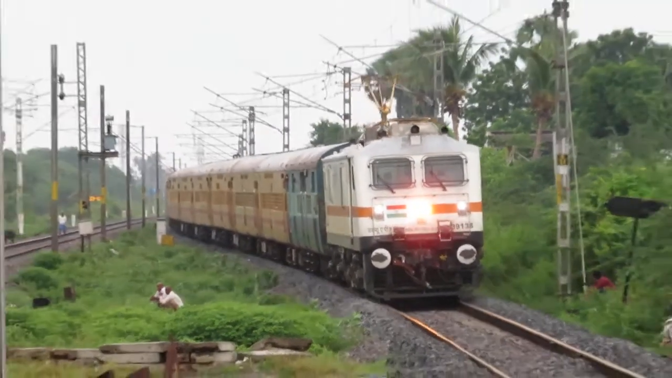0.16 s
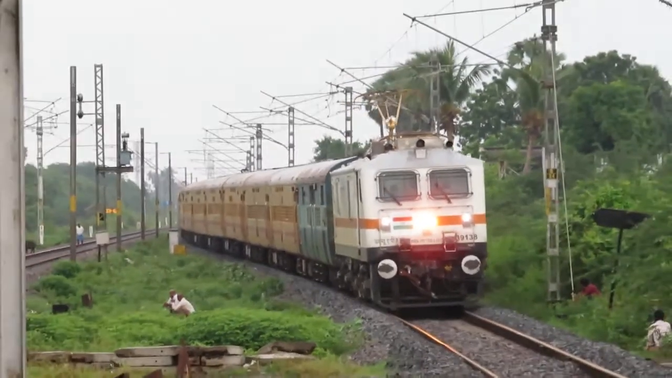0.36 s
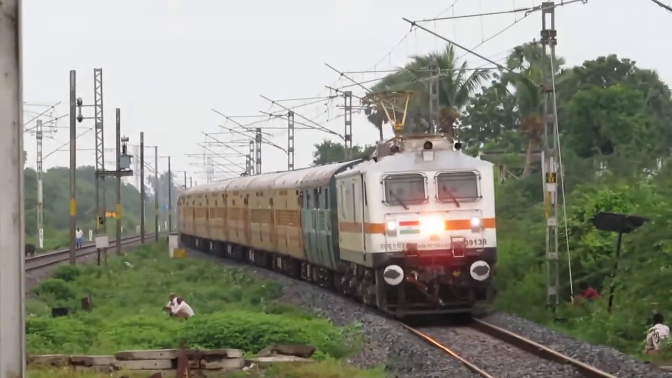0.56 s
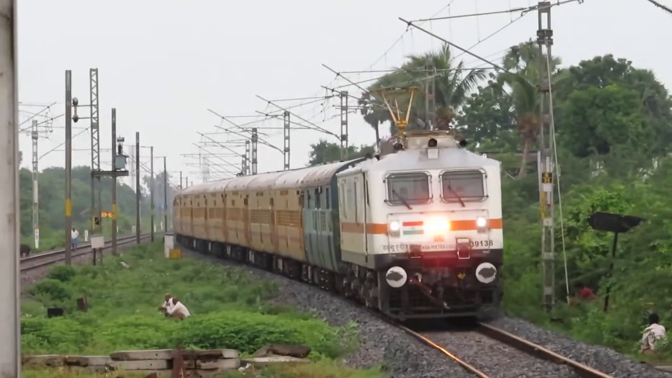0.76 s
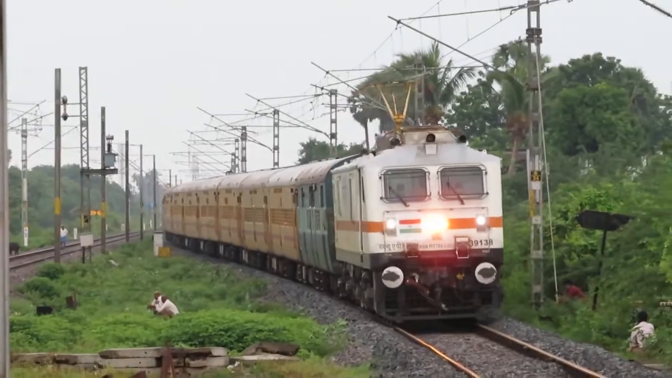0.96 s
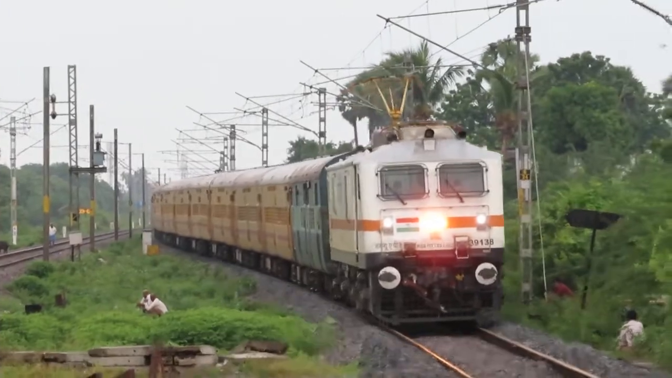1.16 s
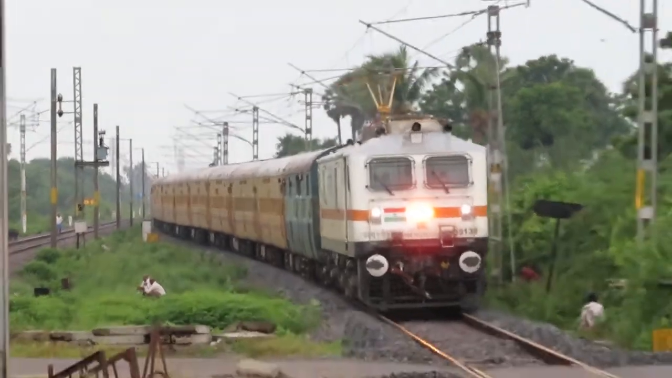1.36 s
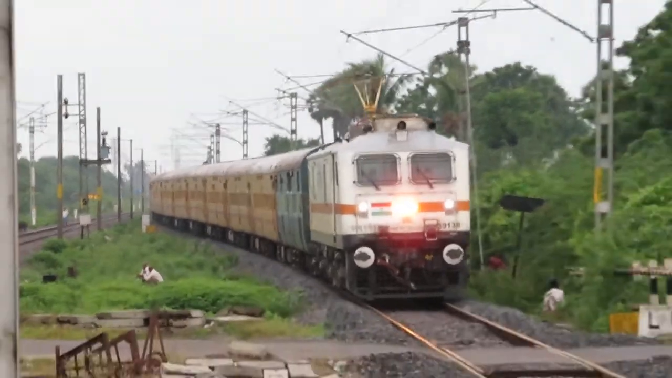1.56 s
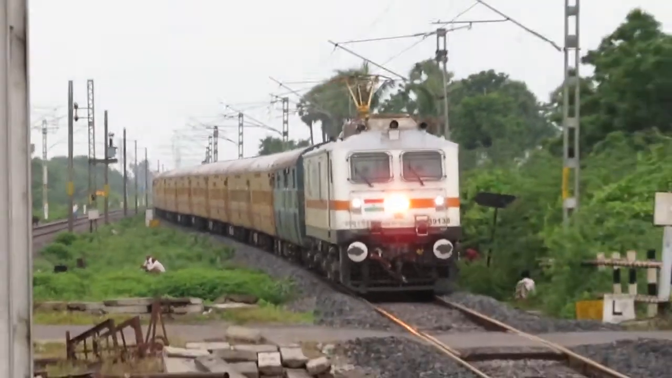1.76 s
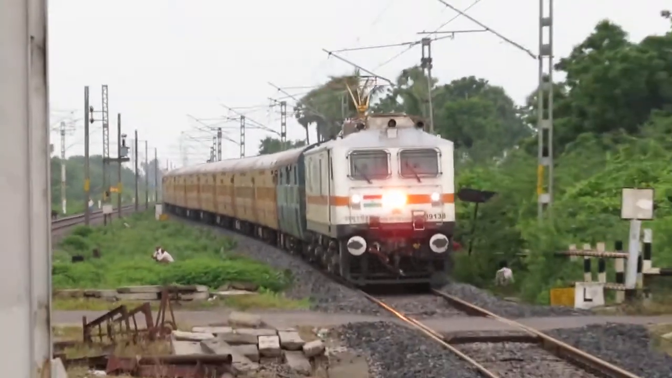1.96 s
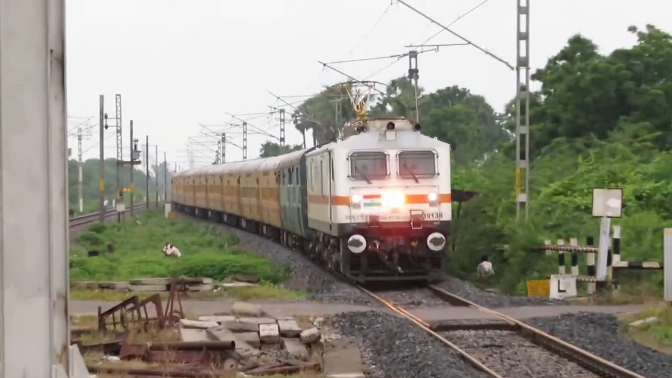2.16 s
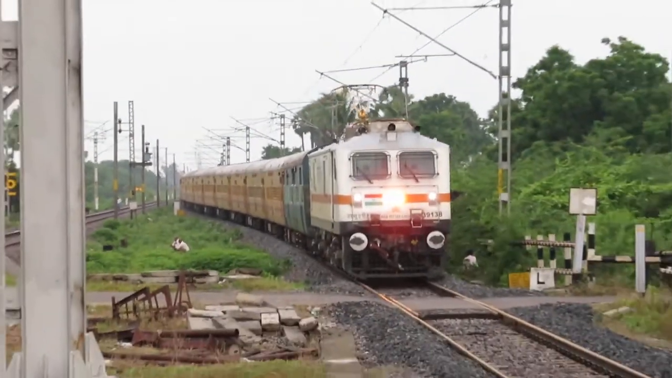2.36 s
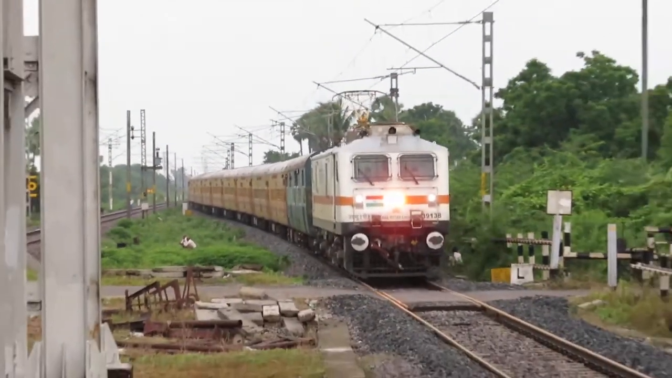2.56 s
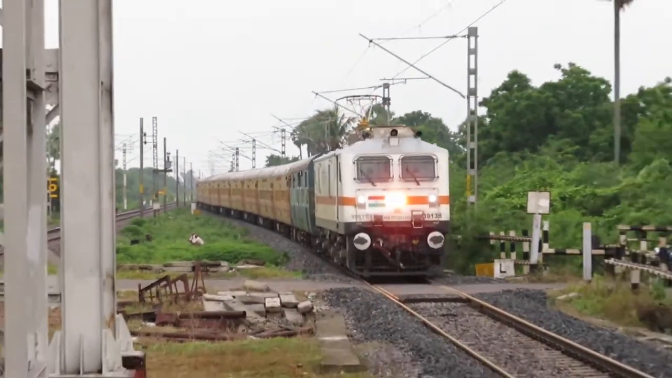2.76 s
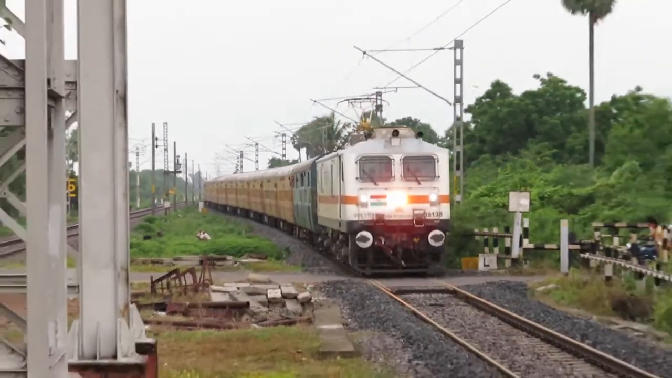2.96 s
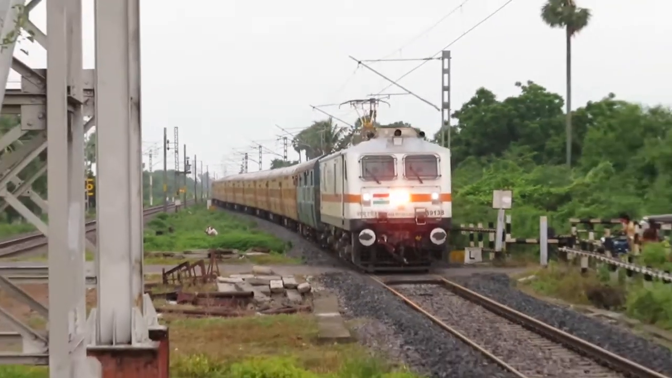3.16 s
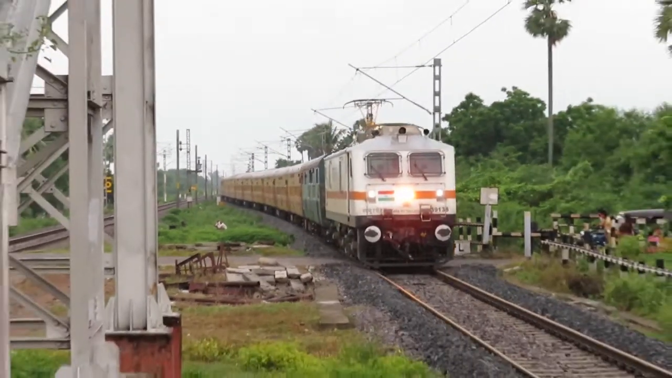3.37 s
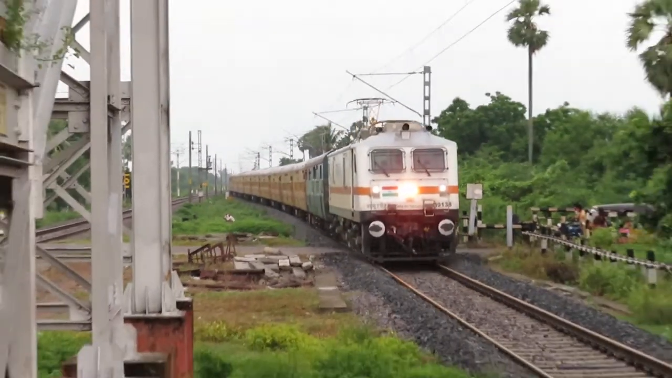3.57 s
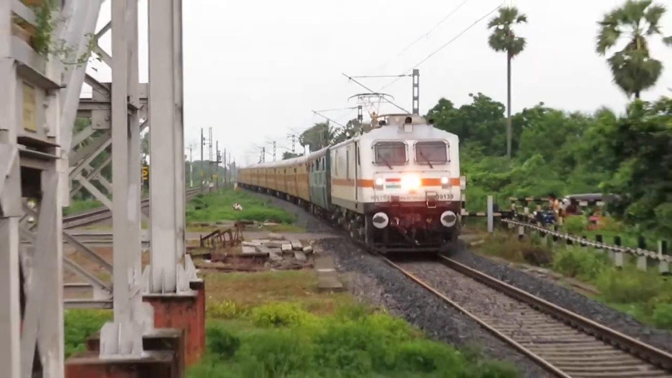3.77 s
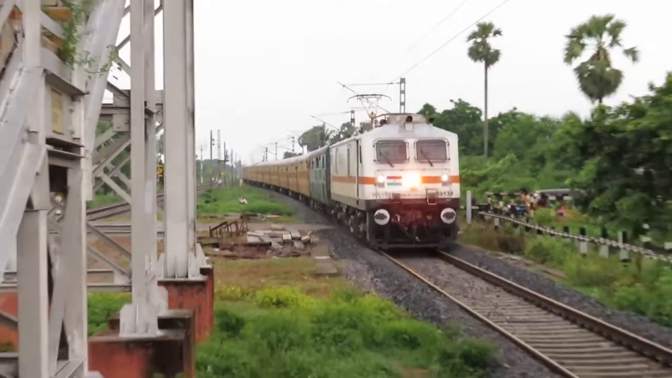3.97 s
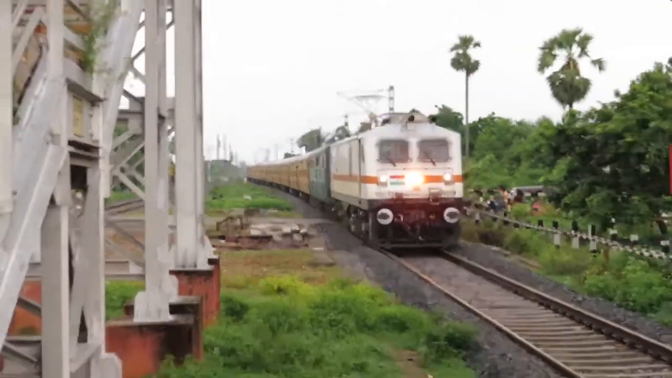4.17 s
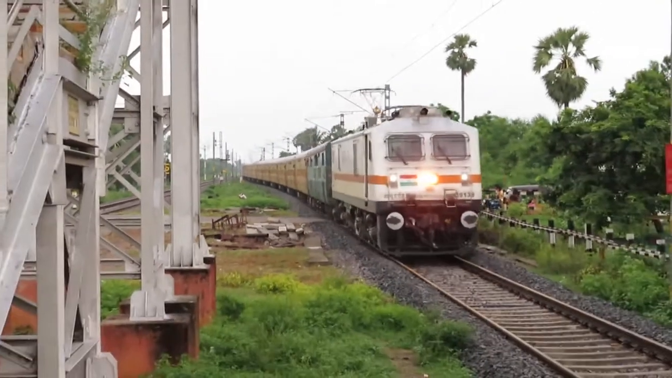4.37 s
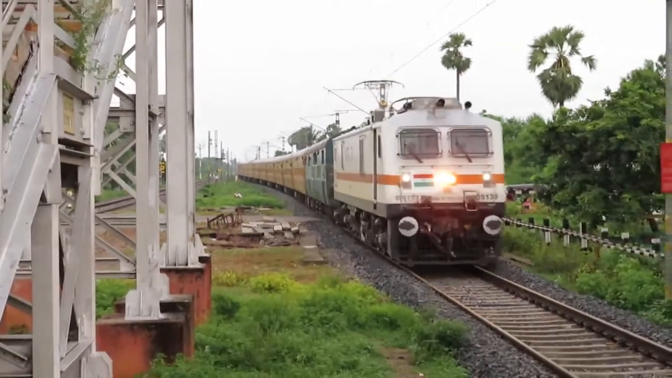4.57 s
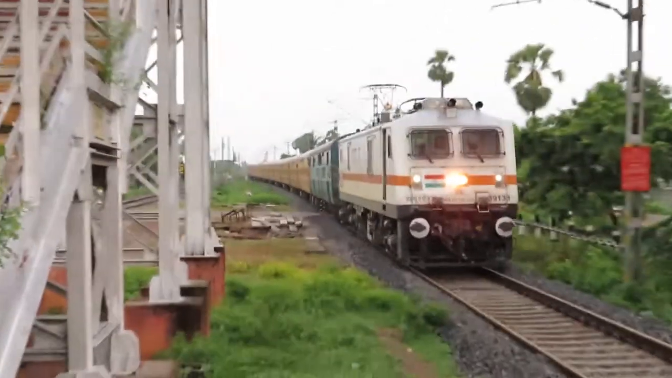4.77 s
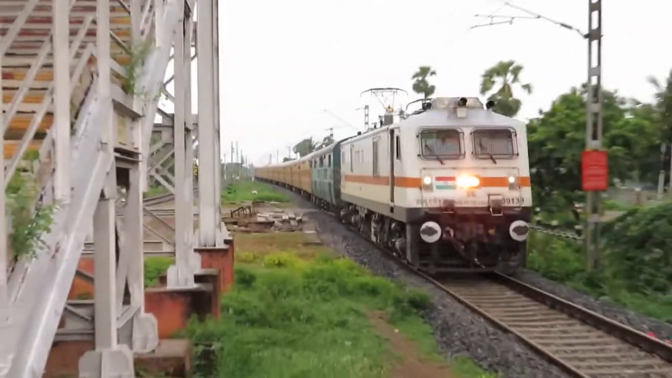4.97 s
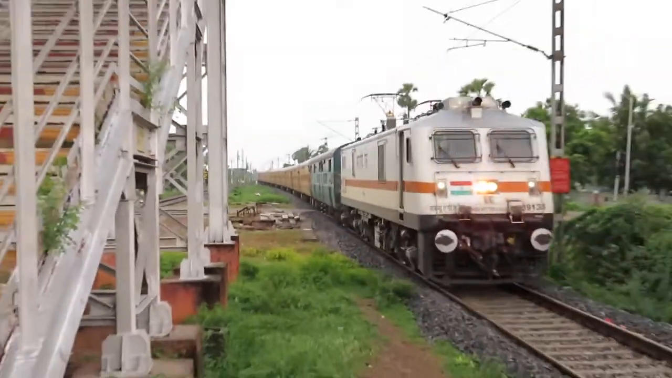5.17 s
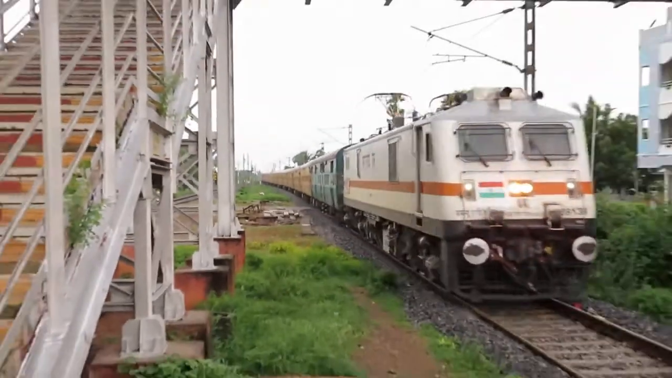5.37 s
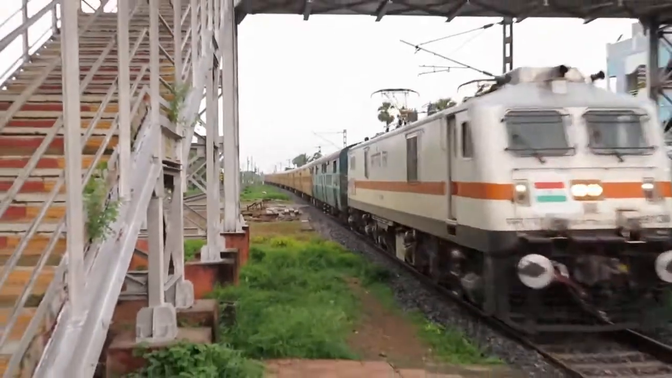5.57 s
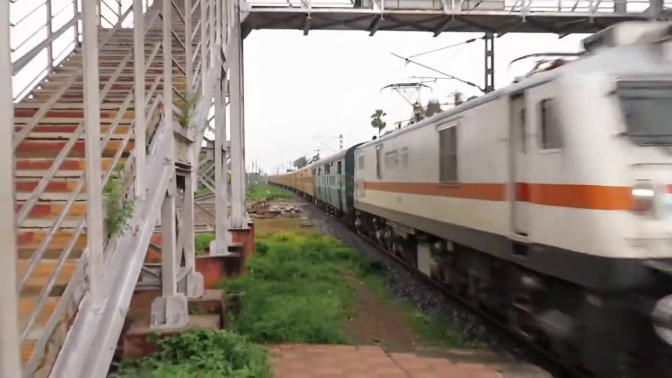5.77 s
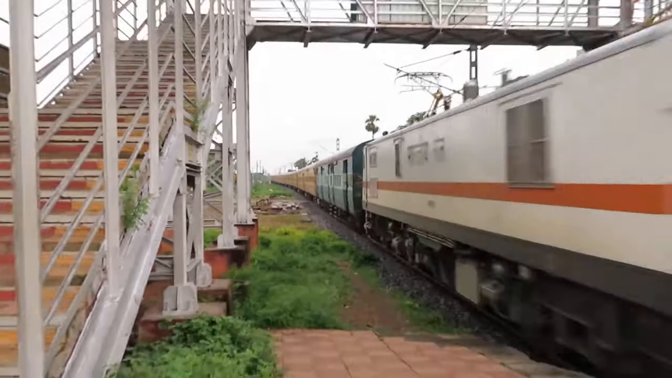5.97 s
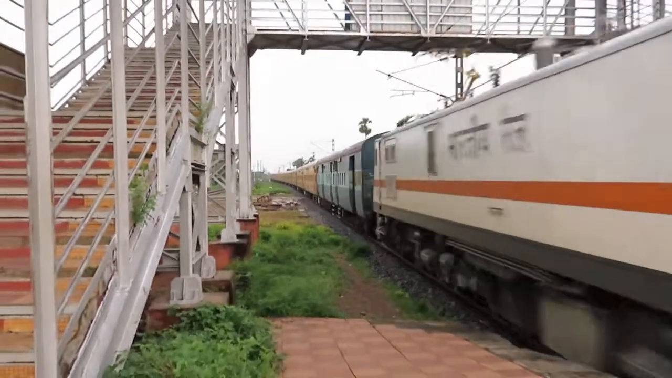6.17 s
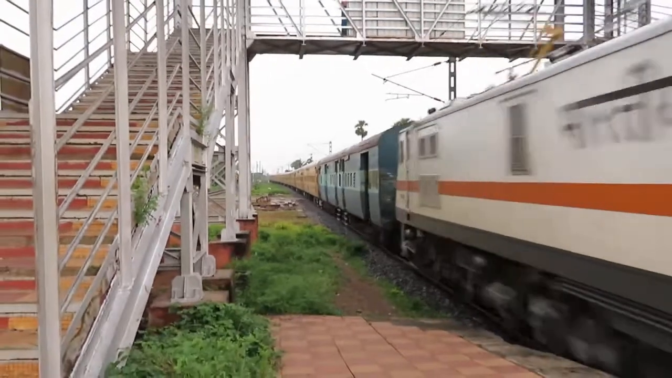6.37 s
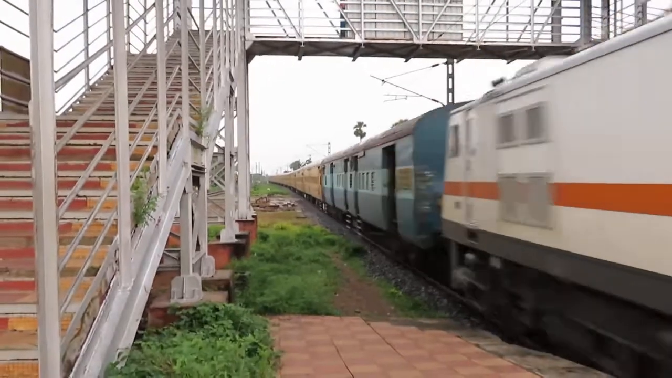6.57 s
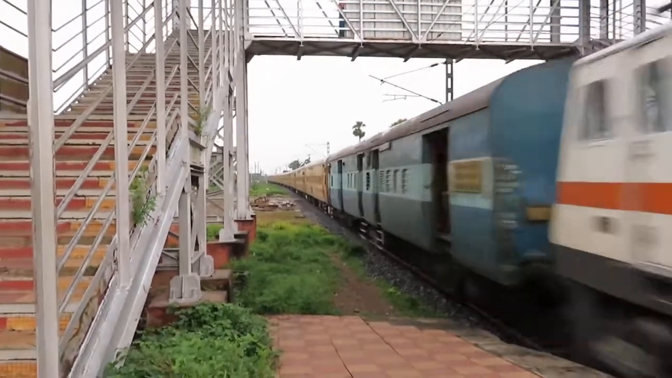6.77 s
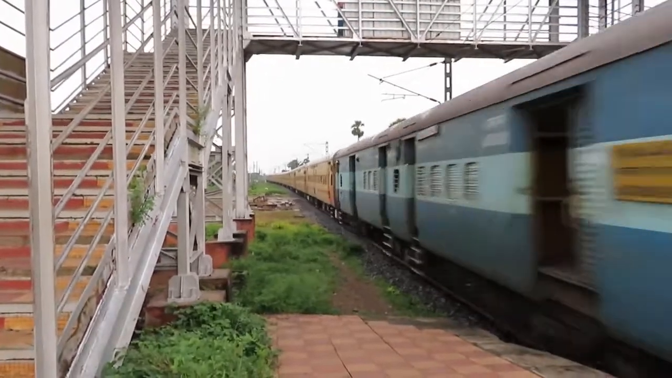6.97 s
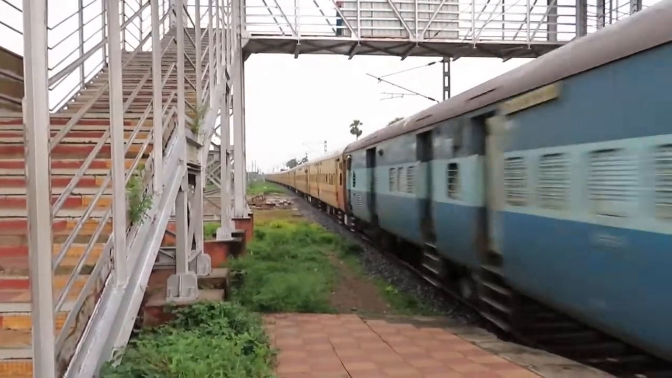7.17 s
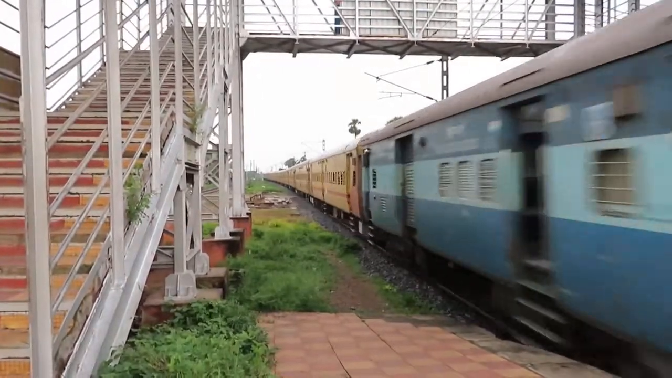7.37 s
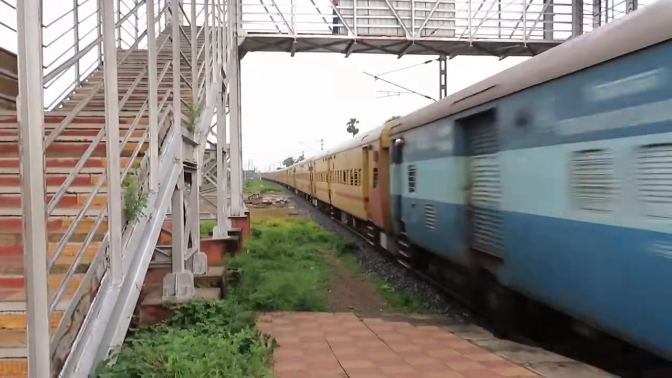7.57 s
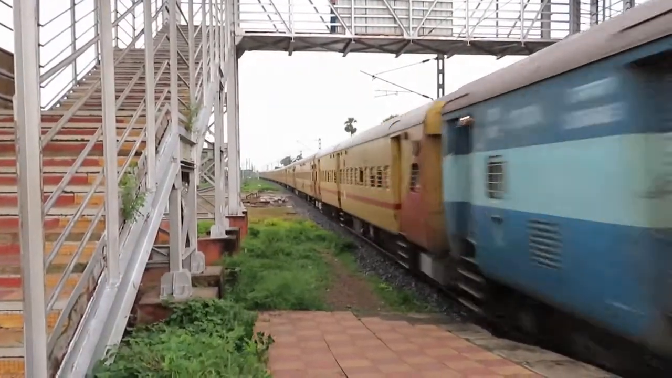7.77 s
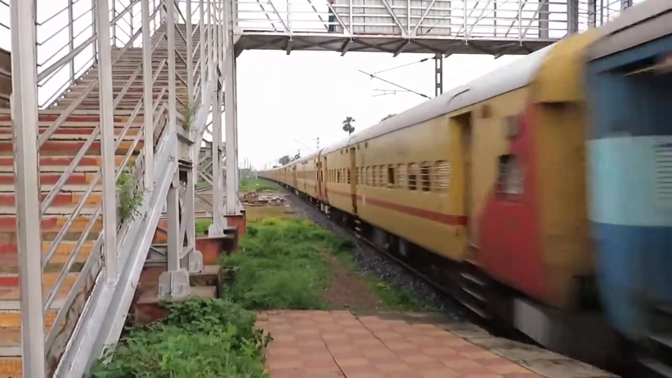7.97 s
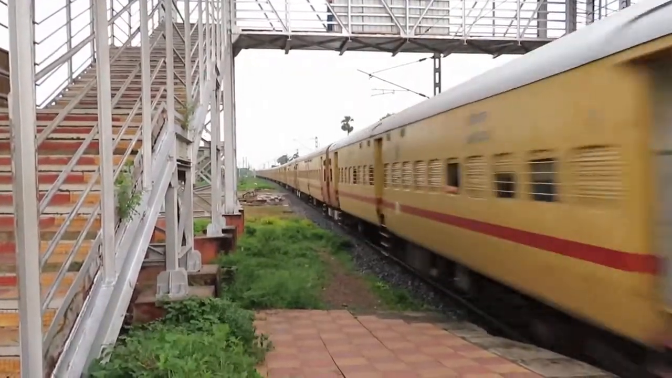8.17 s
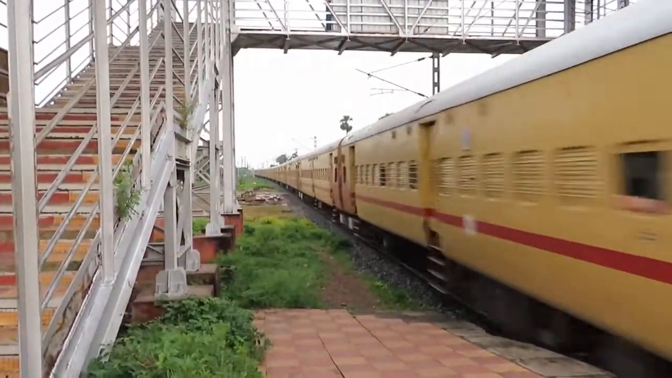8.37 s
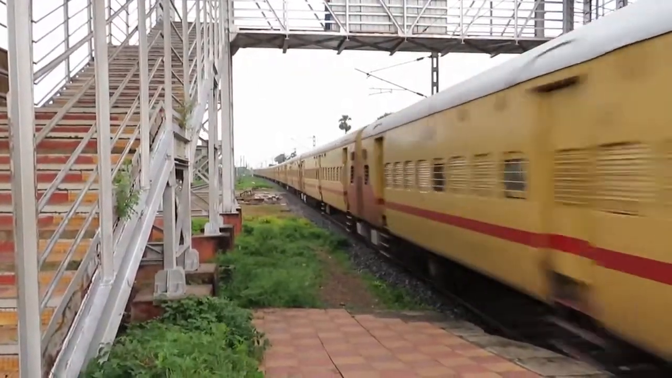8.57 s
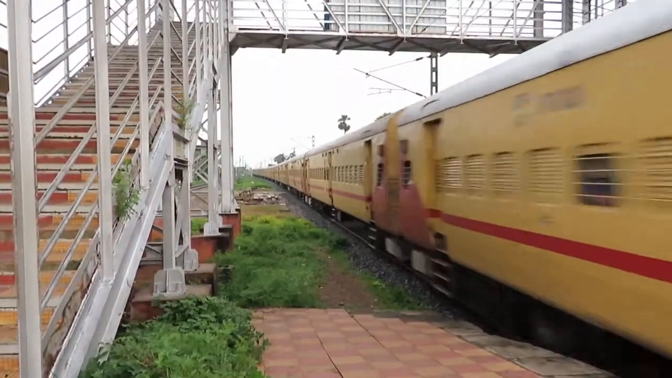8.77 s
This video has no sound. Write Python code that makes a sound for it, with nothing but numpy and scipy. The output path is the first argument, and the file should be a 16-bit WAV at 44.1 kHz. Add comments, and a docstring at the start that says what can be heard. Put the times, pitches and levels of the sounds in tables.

```python
"""A station platform: an electric express nears, its air horn already sounding, blows again and runs past.
The horn is a brassy stack of harmonics, echoed by trees and masts as narrow wavering tones.
Rough wheels shake ground, bogies, sleepers and rails: noise in bands that swells with each group of bogies.
Drive and motors whine and drone, blowers roar in resonant bands, and axles knock as short ringing blows.
The microphone also hears distant rolling and hum, ticks and a thin hiss, ground rumble and side scatter."""
import sys
import numpy as np
from scipy import signal
from scipy.fft import rfft, irfft, next_fast_len
from scipy.io import wavfile
from scipy.ndimage import uniform_filter1d, minimum_filter1d, map_coordinates

SR = 44100
rng = np.random.default_rng(int(sys.argv[2]) if len(sys.argv) > 2 else 0)


def dump_mix(stems):
    """Bounce the given channels to the path in sys.argv[1] as a 16-bit WAV at rate SR."""
    frames = np.atleast_2d(stems).T  # one column per channel
    limited = np.clip(frames, -1, 1)  # hard clip at full scale
    pcm = np.round(limited * 32767).astype(np.int16)
    wavfile.write(sys.argv[1], SR, pcm)


N = 388521
T = np.arange(N) / SR
FREQS = np.maximum(np.fft.rfftfreq(N, 1 / SR), 1)
RELEASE_S = 0.1192  # time scale on which a blast's air drains
ECHO_HZ = 319.6  # pitch of the horn's echoes


def undb(db):
    """Decibels to gain."""
    return 10 ** (np.asarray(db) / 20)


def unit(x):
    """Scale to rms 1."""
    return x / np.sqrt(np.mean(x ** 2) + 1e-18)


def since(s):
    """Seconds since a moment, 0 before it."""
    return np.maximum(T - s, 0)


def curves(rows):
    """Each column of a table, joined by straight lines in time."""
    s, *columns = np.transpose(rows)
    return [np.interp(T, s, c) for c in columns]


def during(rows, fade_s=.02):
    """1 within the time span of a table, fading out beyond it."""
    return np.clip(1 + np.minimum(T - rows[0][0], rows[-1][0] - T) / fade_s, 0, 1)


def hump(at_s, width_s):
    """A smooth rise to 1 and fall, as something goes by; at the control rate."""
    return 1 / (1 + ((T[::64] - at_s) / width_s) ** 2)


def sway(rate):
    """Smooth chance with about `rate` turns a second, at the control rate; spread 1."""
    return map_coordinates(rng.standard_normal(2048), [T[::64] * rate], order=3, mode="wrap")


def fine(control):
    """A control brought up to the sample rate."""
    return np.interp(T, T[::64], control)


def walk(rate):
    """Smooth chance at the sample rate."""
    return fine(sway(rate))


def colour(points):
    """Gain at every frequency from (Hz, dB) points."""
    hz, db = np.transpose(points)
    return undb(np.interp(np.log(FREQS), np.log(hz), db))


def resonance(hz, width_hz):
    """Response of one damped mode, 1 at its centre."""
    return 1 / (1 + 1j * (FREQS / hz - hz / FREQS) * hz / width_hz)


def bank(modes):
    """Summed response of (Hz, width Hz, dB) modes, with steep skirts."""
    return sum(undb(db) * np.abs(resonance(hz, width_hz)) ** 2 for hz, width_hz, db in modes)


def ringing(points):
    """A spectrum with the resonances of bogies, track and wheels laid over it."""
    # resonances: pitch_hz, width_hz, boost_db above the spectrum
    rings = [(215, 62, 1.5), (432, 23, 4.5), (838.5, 137.4, 12.5), (1903, 330, 3.5), (2716, 130, 5.5),
             (3570, 290, 3.5)]
    boost_db = sum(db * np.abs(resonance(hz, width_hz)) ** 2 for hz, width_hz, db in rings)
    return colour(points) * undb(boost_db)


def shaped(x, response):
    """Pass a sound through a frequency response; rms 1."""
    size = next_fast_len(N + SR // 10, real=True)
    gain = np.interp(np.fft.rfftfreq(size, 1 / SR), FREQS, response)
    return unit(irfft(rfft(x, size) * gain, size)[:N])


def noise(response):
    """Noise with a given frequency response."""
    return shaped(rng.standard_normal(N), response)


def played(x, speed):
    """Read a sound at a changing speed, so that its resonances glide."""
    return map_coordinates(x, [np.cumsum(speed) - speed[0]], order=1, mode="mirror")


def doppler(passes_s, turn_s, share):
    """Pitch factor of something that goes by: high before, low after."""
    past_s = T - passes_s
    return 1 - share * past_s / np.hypot(past_s, turn_s)


def horn():
    """Two blasts straight down the line, each with its own harmonics and echoes."""
    # blasts: opens_s, closes_s, level_db, bell_level_db, bell_rings_on_s, bell_beat_hz, echo_db, echo_t60_s
    valve_times = [(-.5, 0.443, -12, -16.5, 0.112, 15.4, 2, 2.64),
                   (1.424, 3.226, -14, -15.5, 0.1644, 7.74, 1.5, 1.63)]
    # harmonics of each blast as they arrive: multiple, level_db; the bell supplies multiple 1 itself
    first_timbre = [(1, -4), (2, -28.5), (3, -4), (4, -11), (5, -16), (6, -16), (7, -17.5), (8, -42.5),
                    (9, -22), (10, -23.5), (11, -24.5), (12, -32.5), (13, -28.5), (14, -36.5), (15, -30.5),
                    (16, -41.5), (17, -40), (18, -43), (19, -46.5), (20, -47.5), (21, -39.5), (22, -49.5),
                    (23, -40), (24, -48.5), (25, -48.5), (26, -51.5)]
    second_timbre = [(1, -2), (2, -15), (3, -1), (4, -2), (5, -12), (6, -13), (7, -21), (8, -12),
                     (9, -18.5), (10, -23), (11, -14.5), (12, -29.5), (13, -25.5), (14, -23.5), (15, -28.5),
                     (16, -20), (17, -39.5), (18, -29.5), (19, -36.5), (20, -42.5), (21, -50), (22, -41.5),
                     (23, -39), (24, -47), (25, -47.5), (26, -48.5)]
    blasts = sum(blast(*row, timbre) for row, timbre in zip(valve_times, (first_timbre, second_timbre)))
    return blasts + shifted_echoes(sum(pressure(*row[:3]) for row in valve_times))


def blast(opens_s, closes_s, db, bell_db, rings_s, beat_hz, echo_db, echo_t60_s, timbre,
          rolloff_db=-1.1527, flicker_db=1.0, drift_db=1.61, jitter=0.00051, dip_flutter_db=0.18,
          ripple_db=0.6924):
    """A diaphragm chops the air into a harmonic stack; at low pressure the note is sharp and dull."""
    # pitch of the held note as it arrives: time_s, pitch_hz
    held_pitch = [(0, 320.1), (.42, 319.6), (2.26, 320.2), (2.6, 318.8), (2.9, 318), (3.22, 318.6)]
    # ground reflections cancel harmonics in turn as the train nears: harmonic, time_s, depth_db, half_width_s
    fades = [(5, 0.041, 9, 0.15), (14, 0.35, 3.5, 0.15), (2, 1.95, 11.5, 0.33), (4, 1.53, 5, 0.07),
             (4, 3.225, 22.5, 0.575), (5, 1.786, 33, 0.147), (7, 2.28, 23.5, 0.13), (8, 1.43, 5.5, 0.28),
             (10, 1.63, 8, 0.15), (10, 2.93, 6, 0.25), (11, 2.536, 8, 0.45), (12, 2.38, 11, 0.033),
             (13, 2.48, 19, 0.081), (14, 1.59, 12.5, 0.22), (15, 1.57, 3.5, 0.2), (15, 2.9, 1, 0.33),
             (16, 1.82, 15, 0.46), (16, 2.45, 20.5, 0.3), (17, 2.27, 8.5, 0.03), (18, 2.33, 12.5, 0.22),
             (18, 1.2, 17, 0.12)]
    # air escaping with the note, clearer as the horn nears: time_s, level_db relative to the full note
    horn_air = [(0, -50), (1.5, -50), (2.3, -46), (2.7, -40), (3.2, -38)]
    # spectrum of that air: frequency_hz, level_db
    air_colour = [(400, -30), (650, -18), (950, -8), (1400, -8), (2300, -8), (3000, -4), (5000, -8),
                  (8000, -15), (11000, -25), (15000, -41)]
    # while pressure builds, the note starts sharp and dull
    onset_sharp_hz, settle_s, onset_dull_db, brighten_s = 9.5, 0.05092, 3, 0.0367
    # over RELEASE_S, as pressure drains: gain in pitch, loss per harmonic
    release_sharp_hz, release_dull_db = 4.77, 2
    # the second harmonic shares the bell's overshoot, and the ground dip then swallows it
    onset_octave_db, onset_octave_s = 12.5, 0.082

    age = since(opens_s)
    drained = np.minimum(since(closes_s) / RELEASE_S, 3)
    hz = curves(held_pitch)[0] + onset_sharp_hz * np.exp(-age / settle_s)
    hz = hz + release_sharp_hz * np.minimum(drained, 1)
    dull_db = -onset_dull_db * np.exp(-age / brighten_s) - release_dull_db * drained
    loudness = pressure(opens_s, closes_s, db)
    phase = 2 * np.pi * np.cumsum(hz * (1 + jitter * walk(60))) / SR
    stack = 0
    # the bell and the ground shift each harmonic's phase
    arrival = rng.uniform(0, 2 * np.pi, size=45)
    for k in range(2, 45):
        # beyond the table the harmonics fall off steadily
        own_db = timbre[min(k, len(timbre)) - 1][1] + rolloff_db * max(k - len(timbre), 0)
        fade_db = sum(depth * hump(s, width) for harmonic, s, depth, width in fades
                      if round(harmonic) == k and opens_s < s < closes_s)
        # turbulent air makes the high harmonics waver most
        waver_db = min(k / 12, 1.6) * (drift_db * sway(3.034) + flicker_db * sway(21.93))
        # small changes of path ripple the level, more in the ground dip and in any fade
        dip = np.clip((k == 2) + fade_db / 20, 0, 1)
        waver_db = waver_db + (ripple_db + dip_flutter_db * dip) * sway(20)
        own_db = own_db + (k == 2) * onset_octave_db * np.exp(-age[::64] / onset_octave_s)
        level_db = own_db + dull_db[::64] * (k - 2.5) - fade_db + waver_db
        stack = stack + fine(undb(level_db)) * np.sin(k * phase + arrival[k])
    air = undb(curves(horn_air)[0] + 6.6 * dull_db) * noise(colour(air_colour))
    lowest = bell(phase, opens_s, closes_s, bell_db, rings_s, beat_hz)
    direct = loudness * (np.sqrt(2) * stack + air) + np.sqrt(2) * lowest
    return direct + undb(echo_db) * echo(loudness, echo_t60_s)


def pressure(opens_s, closes_s, db):
    """Loudness of a blast: a quick rise, a hold, and a fall as the air drains."""
    attack_s, release_db = 0.0056, 19  # release_db is lost in the first RELEASE_S
    drained = np.minimum(since(closes_s) / RELEASE_S, 3)
    return np.minimum(since(opens_s) / attack_s, 1) * undb(db - release_db * drained ** 2)


def bell(phase, opens_s, closes_s, db, rings_s, beat_hz, waver_db=1.0, beat_share=0.52):
    """The horn's lowest mode; as it dies away it beats with near echoes, and a flat echo lingers from the side."""
    # it starts to build before the diaphragm beats, overshoots, sags and rings on
    lag_s, build_db_per_s, overshoot_db, settle_s = 0.0074, 250, 8.5, 0.037
    sag_db_per_s, decay_db_per_s = 3, 94.5
    # a reflector far to the side returns the tone flat, so that the two beat
    side_hz, side_db, side_decay_db_per_s = 305.46, -21, 3

    age, after = since(opens_s + lag_s), since(closes_s)
    held_db = db - build_db_per_s * np.maximum(opens_s + lag_s - T, 0) - sag_db_per_s * age
    own_db = overshoot_db * np.exp(-age / settle_s) - decay_db_per_s * since(closes_s + rings_s)
    near_echo = beat_share * np.sin(phase - 2 * np.pi * beat_hz * after)
    tone = (np.sin(phase) + near_echo) / (1 + beat_share)
    side_tone = np.sin(2 * np.pi * side_hz * T + walk(17.0))
    side = undb(side_db - side_decay_db_per_s * after) * side_tone
    return undb(held_db) * (undb(own_db + waver_db * walk(13)) * tone + side)


def echo(loudness, t60_s, scatter_hz=13, scatter_per_harmonic_hz=1.2, tilt_db=0.4047, near_share=0.886):
    """Many paths add up, so each echoed harmonic flares and drops out by itself, the high ones fastest."""
    # echoes miss the direct path's fades: multiple, level_db before the tilt
    echo_timbre = [(2, -19), (3, -18), (4, -24), (5, -28), (6, -28.5), (7, -31), (8, -32.5), (9, -34.5),
                   (10, -44), (11, -42.5), (12, -46), (13, -44), (14, -50.5), (15, -49.5), (16, -57.5),
                   (17, -60), (18, -59), (19, -56.5), (20, -63.5)]
    out = 0
    for k, (_, db) in enumerate(echo_timbre, 2):
        rate = scatter_hz + scatter_per_harmonic_hz * k
        phase = 2 * np.pi * k * ECHO_HZ * T
        scattered = walk(rate) * np.cos(phase) + walk(rate) * np.sin(phase)
        out = out + undb(db + tilt_db * (k - 8)) * scattered
    return lingering(loudness, t60_s, np.clip(near_share, 0, 1)) * out


def lingering(loudness, t60_s, near_share):
    """Near masts and walls answer for a moment, far trees give a faint tail; their power adds up."""
    first_s, near_s = .03, .13
    lag = T[:2 * SR:64]
    near = (lag > first_s) * np.exp(-(lag / near_s) ** 6)
    far = (lag > first_s) * np.exp(-2 * np.log(1000) * lag / t60_s)
    spread = near_share * near / near.sum() + (1 - near_share) * far / far.sum()
    # a note sounding at the start is taken to have sounded before it
    power = np.pad(loudness[::64] ** 2, (len(lag) - 1, 0), "edge")
    return fine(np.sqrt(np.convolve(power, spread, "valid")))


def shifted_echoes(loudness, skirt_db=-27, skirt_t60_s=1.42, skirt_fall_db_per_percent=1.2, waver_db=5.5):
    """Each direction returns the moving horn at another pitch: faint tones, and a skirt below each harmonic."""
    # reflectors at other angles to the track: pitch_hz, t60_s, then level_db of harmonics 1 to 5 re the note
    side_tones = [(289.3, 6.3, -36, -40, -36.5, -49, -52), (350.6, 0.44, -46, -45, -46, -48, -55.5)]
    # spectrum of the skirt that scatter beside the track adds: frequency_hz, relative density_db
    skirt_colour = [(200, -30), (320, 3), (640, 1), (960, 4), (1280, -7), (2600, -17), (3600, -23),
                    (5200, -32), (8000, -46), (14000, -72)]
    # how far each frequency lies below the next harmonic
    flat_percent = 100 * (1 - FREQS / ECHO_HZ / np.ceil(FREQS / ECHO_HZ))
    fall = undb(-skirt_fall_db_per_percent * flat_percent) * (flat_percent < 10)
    skirt = noise(colour(skirt_colour) * fall)
    out = undb(skirt_db) * lingering(loudness, skirt_t60_s, 0) * skirt
    for hz, t60_s, *levels_db in side_tones:
        tones = 0
        for k, db in enumerate(levels_db, 1):
            wavering = fine(undb(db + waver_db * sway(3.3)))
            tones = tones + wavering * np.sin(2 * np.pi * k * hz * T + walk(7.8))
        out = out + np.sqrt(2) * lingering(loudness, t60_s, 0) * tones
    return out


def rolling(grit_db=0.76, throb_db=0.8965, flicker_db=0.6549):
    """Wheel and rail roughness drives each part; all share one random throb, and each flickers by chance."""
    # spectrum of the rolling noise: frequency_hz, level_db
    roll_colour = [(22, -25.5), (38, -17.5), (52, -7), (70, -10.5), (100, 0), (140, -6), (220, 4.5),
                   (330, -2.5), (560, -10.5), (1120, -15.5), (1500, -23.5), (3000, -29), (6000, -44.5),
                   (9500, -50), (14000, -67)]
    # it grows as the train nears, then swells with each group of bogies: time_s, strength_db
    roll_level = [(3.55, -27.5), (3.76, -25), (4, -17.5), (4.25, -19.5), (4.5, -12), (4.8, -11.5),
                  (4.98, -5.5), (5.05, -4), (5.3, -2.5), (5.6, 1), (6.1, -1), (6.4, 2), (6.75, -1.27),
                  (7.03, 1.48), (7.18, -2.5), (7.35, -3.5), (7.55, -3.5), (7.85, 0), (8.12, -1), (8.42, -5),
                  (8.8, -2.5)]
    # ground, bogie frames, sleepers, wheel discs, wheel rims, rails, the contact's own hiss: from_hz, to_hz
    part_bands = [(20, 140), (140, 340), (340, 680), (680, 980), (980, 1400), (1400, 6000), (6000, 15000)]
    # the same parts: level_db, follows (dB per dB of strength), extra_db beside the locomotive,
    # extra_db beside the coaches, pitch_wander from wheel to wheel (fraction)
    part_levels = [(-22.5, 1.232, -3.5, -0.5, 0), (-19.5, 0.907, -2.5, -2.5, 0),
                   (-27, 0.944, 2.5, 6.5, .012), (-28.5, 1.242, -0.9, 1.8, .03), (-41, 0.66, 7.5, 10, .03),
                   (-36, 0.909, 2.7, 1, 0.000031), (-69.5, 1.1, 17.5, 15.5, 0)]
    # the locomotive is abreast around loco_s; the coaches take over from coaches_s
    loco_s, loco_width_s, coaches_s, handover_s = 6.634, 0.676, 6.85, 0.5178

    body = ringing(roll_colour)
    # contact comes in millisecond grains of uneven force
    force = np.minimum(rng.exponential(size=len(T[::48])), 3.5)
    grains = np.interp(T, T[::48], undb(grit_db * force))
    contact = rng.standard_normal(N) * grains
    throb = throb_db * np.clip(walk(24), -1.5, 1.5)
    strength_db = curves(roll_level)[0]
    locomotive = np.exp(-((T - loco_s) / loco_width_s) ** 2)
    coaches = np.minimum(since(coaches_s) / handover_s, 1)
    out = 0
    for (lo, hi), (db, follows, loco_db, coach_db, wander) in zip(part_bands, part_levels):
        band = 1 / np.sqrt((1 + (lo / FREQS) ** 16) * (1 + (FREQS / hi) ** 16))
        level_db = db + follows * strength_db + loco_db * locomotive + coach_db * coaches
        part = played(shaped(contact, body * band), 1 + wander * coaches * walk(6))
        out = out + undb(level_db + throb + flicker_db * walk(14)) * part
    return out * during(roll_level, fade_s=0.53)


def knocks(thud_db=0, clang_db=0, crack_db=-1, rise_s=0.00304, thud_t60_s=0.072, clang_t60_s=0.085,
           crack_t60_s=0.07, detune=.05):
    """Each axle scuffs the track: bogie thuds, rail and wheel clang, steel cracks, all detuned by chance."""
    # axles striking uneven spots: start_s, scuff_length_s, then thud_db, clang_db, crack_db before the trims
    strikes = [(2.245, .02, -49, -59, -77.5), (2.334, 0.0165, -52, -58.5, -75),
               (2.54, 0.0113, -32, -61.5, -73), (4.391, .01, -25.5, -36, -58.5),
               (5.026, 0.0164, -14, -31.5, -46), (5.068, 0.0124, -12, -40.5, -50),
               (5.172, 0.0223, -17.5, -35.5, -51.5), (5.252, 0.0248, -17.5, -29.5, -40.5),
               (5.412, 0.0084, -15, -28, -48), (5.489, 0.0074, -22, -17, -32),
               (5.599, .008, -16.5, -18.5, -44), (5.896, 0.0045, -14.5, -18, -42.5),
               (5.996, 0.0132, -20, -15.5, -48.5), (6.086, .004, -15.5, -14, -35.5),
               (6.517, .016, -21.5, -10.5, -43.5), (6.552, .012, -13.5, -15.5, -48.5),
               (6.73, 0.0109, -14, -20.5, -31.5), (6.832, 0.017, -13.5, -33, -42),
               (6.98, 0.00624, -12, -13, -38), (7.096, 0.011, -23, -17, -39),
               (7.196, 0.0102, -18, -19, -41.5), (7.545, .008, -13.5, -28, -47),
               (7.641, 0.0272, -15.5, -20.5, -50.5), (7.683, 0.02, -16.5, -13.5, -42.5),
               (7.782, 0.0207, -11.5, -13, -41), (7.838, 0.013, -20.5, -13, -34.5),
               (7.93, 0.0074, -18, -18.5, -36), (8.037, 0.0078, -14.5, -17.5, -45.5),
               (8.063, 0.0216, -20, -9, -37.5), (8.15, 0.026, -16.5, -20.5, -51.5),
               (8.211, 0.0111, -28.5, -12.5, -41.5), (8.309, 0.0106, -16, -15.5, -45),
               (8.519, 0.0128, -23, -20, -41), (8.619, 0.0225, -23.5, -19, -39),
               (8.661, 0.0074, -18.5, -12, -39.5), (8.769, 0.05, -16.5, -22.5, -51),
               (8.794, 0.013, -12.5, -15, -41)]
    # what a thud and a clang ring with: pitch_hz, width_hz, level_db (pitch and width before detuning)
    thud_modes = [(112, 27, -11), (170.45, 17, 6.5), (221, 42, -4.5), (302.5, 57, 0.5)]
    clang_modes = [(393.5, 100, 7.5), (446.1, 48, 4), (609, 97, -11.5), (782.6, 190, -2.5), (1092, 84, -12),
                   (2720, 970, -43)]
    # the crack of steel on steel: frequency_hz, level_db (frequency before detuning)
    crack_colour = [(700, -25), (1400, 1.5), (2000, 1), (2900, -1), (4500, -13.5), (8000, -31.5),
                    (14000, -55.5)]
    out = np.zeros(N)
    age = T[:SR // 5]
    speeds = 1 + detune * rng.uniform(-1, 1, len(strikes))
    layers = ((bank(thud_modes), thud_db, thud_t60_s),
              (bank(clang_modes), clang_db, clang_t60_s),
              (colour(crack_colour), crack_db, crack_t60_s))
    for layer, (response, trim_db, t60_s) in enumerate(layers):
        ring = noise(response)
        for (s, scuff_s, *levels_db), speed in zip(strikes, speeds):
            rise = 1 - np.exp(-(age / rise_s) ** 2)
            envelope = rise * np.exp(-np.log(1000) * np.maximum(age - scuff_s, 0) / t60_s)
            start = min(int(s * SR), N)
            rung = map_coordinates(ring, [start / 2 + speed * age * SR], order=1, mode="mirror")
            blow = unit(envelope * rung) * np.sqrt(np.mean(envelope ** 2))
            out[start:start + len(age)] += (undb(levels_db[layer] + trim_db) * blow)[:N - start]
    return out


def whine(width=45):
    """A clean drive tone while it faces the platform, smeared when many wheels and paths mix."""
    # strongest and cleanest facing the platform: time_s, level_db, smear (0-1)
    whine_level = [(3.5, -47, 0.93), (4.6, -48, 0.54), (5.5, -27, 0.58), (5.6, -16, 0.56),
                   (5.74, -14.5, 0.29), (5.82, -21.5, 0.08), (6.25, -25.5, 0.1), (7, -29.5, 1),
                   (7.3, -34, 0.85)]
    # fundamental and overtones: multiple, level_db
    orders = [(1, 0), (2, -30), (3, -33.5)]
    # the pitch falls by the Doppler shift as it passes
    pitch_hz, passes_s, turn_s, doppler_share = 844.1, 6.4, 0.28695, .04
    db, smear = curves(whine_level)
    smear = np.clip(smear, 0, 1)
    hz = pitch_hz * doppler(passes_s, turn_s, doppler_share)
    phase = 2 * np.pi * np.cumsum(hz) / SR
    out = 0
    for k, (_, order_db) in enumerate(orders, 1):
        swing = np.sqrt(2 * (1 - smear)) + np.sqrt(smear) * (walk(width) + 1j * walk(width))
        out = out + undb(order_db) * np.real(swing * np.exp(1j * k * phase))
    return out * undb(db) * during(whine_level, fade_s=0.13)


def drone(width=40):
    """A narrow, unsteady, lower tone from the traction motors as they come abreast."""
    # time_s, pitch_hz, level_db
    motor_tone = [(5.9, 434.1, -42), (6.2, 432, -20.5), (6.5, 419.6, -19), (6.65, 416.7, -24.5),
                  (6.95, 419.5, -20.5), (7.2, 403.9, -34)]
    hz, db = curves(motor_tone)
    swing = walk(width) + 1j * walk(width)
    tone = np.real(swing * np.exp(2j * np.pi * np.cumsum(hz) / SR))
    return tone * undb(db) * during(motor_tone, fade_s=.1)


def blowers(sweep=0.048, flutter_db=1.49):
    """Fan air roars through the side grilles; each swells and falls in pitch as it faces the platform."""
    # grilles going by: abreast_s, level_db, width_s (standard deviation of the swell)
    grilles = [(5.5, -38, 0.273), (6.41, -34, 0.09), (7.06, -38, .19)]
    # bands of the roar when abreast: pitch_hz, width_hz, level_db
    blower_modes = [(1370, 180, -6.5), (1723, 210, 6.5), (2049, 140, 6.5), (2510, 130, -13.5),
                    (2566, 130, 2.5)]
    out = 0
    for s, db, width_s in grilles:
        roar = played(noise(bank(blower_modes)), doppler(s, 3 * width_s, sweep))
        out = out + undb(db) * np.exp(-((T - s) / width_s) ** 2 / 2) * roar
    return out * undb(flutter_db * walk(45))


def rumble():
    """The ground trembles ahead of the locomotive and again under its weight."""
    # time_s, level_db
    rumble_level = [(3.6, -54.5), (4.2, -43.5), (4.8, -30.5), (5.15, -29.5), (5.4, -35.5), (6, -36),
                    (6.1, -28), (6.35, -21.5), (6.45, -50)]
    # frequency_hz, level_db; nothing above the last frequency
    rumble_colour = [(20, -16), (40, -3), (70, -2.5), (105, 3), (160, -18), (400, -45.5)]
    tremble = noise(colour(rumble_colour) * (FREQS < rumble_colour[-1][0]))
    return undb(curves(rumble_level)[0]) * during(rumble_level, fade_s=0.26) * tremble


def hisses():
    """Thin bursts of noise that start abruptly: three short fading ticks, then a steady hiss, cut off."""
    # axles clicking over a distant rail joint, then the longer hiss:
    # start_s, length_s, level_db, t60_s, upper_edge_hz
    ticks_and_hiss = [(3.815, 0.088, -42.5, 0.2, 6500), (3.912, 0.107, -49, 0.16, 5500),
                      (4.016, .1, -48, .12, 5000), (4.335, 0.633, -47, 56, 13100)]
    # spectrum below the upper edge: frequency_hz, level_db
    hiss_colour = [(800, -2), (2000, 10), (4500, -5), (6500, -15.5), (11000, -23), (15000, -38.5)]
    out = 0
    for s, length_s, db, t60_s, edge_hz in ticks_and_hiss:
        decay = undb(db) * np.exp(-np.log(1000) * since(s) / t60_s)
        envelope = decay * during([(s,), (s + length_s,)], fade_s=0.004)
        out = out + envelope * noise(colour(hiss_colour) / (1 + (FREQS / edge_hz) ** 6))
    return out


def far_train(roll_db=0, hum_db=-1.0, sing_db=-8, sing_hz=850, width=20):
    """Distant rolling, a thin singing of the drive and a low hum, until the near sound takes over."""
    # spectrum of the rolling far off: frequency_hz, level_db
    far_colour = [(25, -21), (50, -4.5), (110, -5.5), (170, -10), (250, -7), (420, -15), (510, -25.5),
                  (640, -13.5), (860, -20.5), (1100, -20), (2000, -26.5), (3000, -35), (5000, -43.5),
                  (8000, -54), (14000, -70.5)]
    # tones of the hum: pitch_hz, level_db before the swell and trim
    hum_tones = [(49.6, -5.5), (99.2, -12)]
    # the hum is strongest between the blasts: time_s, boost_db
    hum_swell = [(0, 1), (1.4, 5), (1.6, -4), (2.3, 1), (3.1, -12)]
    # level of the far sound, turned down under the horn and up between the blasts: time_s, level_db
    far_level = [(0, -48), (.7, -42), (1.42, -35), (1.55, -46), (2.55, -43.5), (3.25, -46), (3.6, -51.5)]
    hum = sum(undb(db + walk(9.4)) * np.sqrt(2) * np.sin(2 * np.pi * hz * T) for hz, db in hum_tones)
    roll = noise(ringing(far_colour)) * undb(walk(9.73))
    sing = noise(bank([(sing_hz, width, 0)]))
    sound = undb(roll_db) * roll + undb(sing_db) * sing
    sound = sound + undb(hum_db + curves(hum_swell)[0]) * hum
    return undb(curves(far_level)[0]) * during(far_level, fade_s=0.112) * sound


def surroundings(x, t60_s=0.51, side_db=-26, bright_hz=1600):
    """Platform and footbridge scatter a little sound from the sides, mostly treble."""
    age = T[:SR // 3]
    tail = rng.standard_normal(len(age)) * np.exp(-np.log(1000) * age / t60_s)
    side = signal.fftconvolve(x, tail / np.linalg.norm(tail))[:N]
    side = signal.sosfilt(signal.butter(1, 130, "high", fs=SR, output="sos"), side)
    # the slope of the waveform adds treble
    treble = np.diff(side, prepend=0) * SR / (2 * np.pi * bright_hz)
    return undb(side_db) * (side + treble)


def scene(right_db=1.03, lag_s=.00003):
    """The horn comes from straight ahead; the train passes slightly to the right."""
    locomotive = whine() + drone() + blowers() + rumble()
    mid = horn() + far_train() + locomotive + rolling() + knocks() + hisses()
    abreast = np.clip(T - 5.1, 0, 1)
    side = surroundings(mid)
    # the left channel comes to lag and weaken
    left = np.interp(T - lag_s * abreast, T, mid)
    return np.array([left * undb(-right_db * abreast / 2) + side,
                     mid * undb(right_db * abreast / 2) - side])


def record(dry):
    """Behind the microphones a limiter eases the highest peaks down; the top is cut."""
    ceiling, top_hz = .74, 15600
    gain = ceiling / np.maximum(np.abs(dry).max(axis=0), ceiling)
    gain = minimum_filter1d(gain, size=800)
    gain = uniform_filter1d(uniform_filter1d(gain, size=400), size=400)
    return signal.sosfilt(signal.ellip(8, .2, 80, top_hz, fs=SR, output="sos"), dry * gain)


dry = scene()
out = record(dry)
dump_mix(out)
```